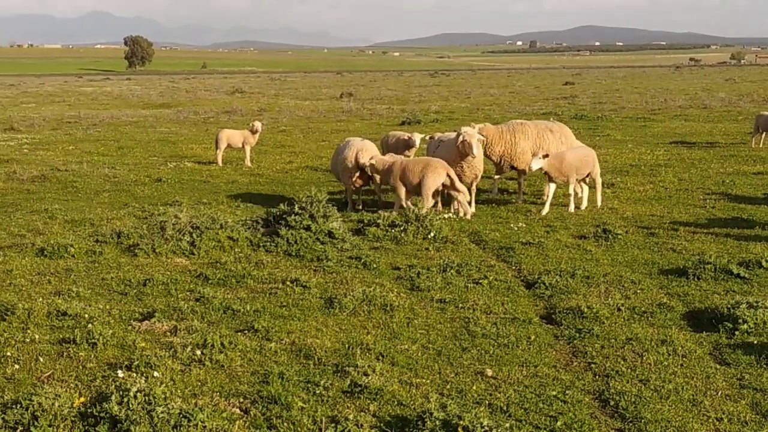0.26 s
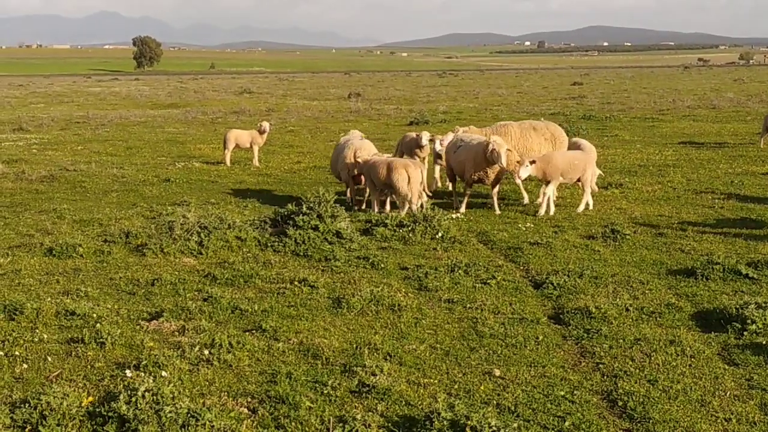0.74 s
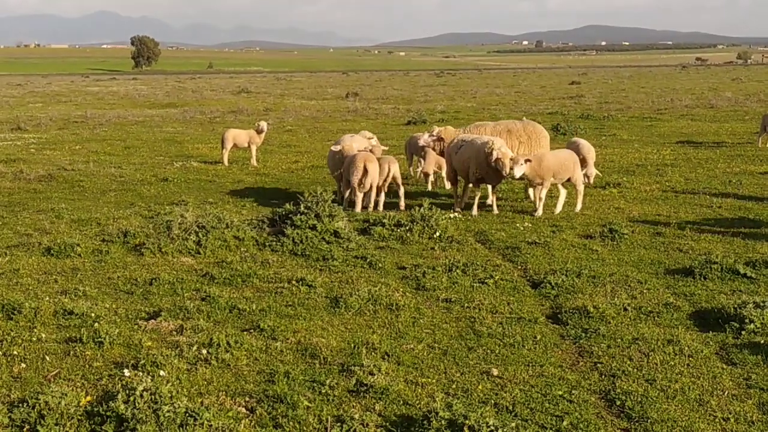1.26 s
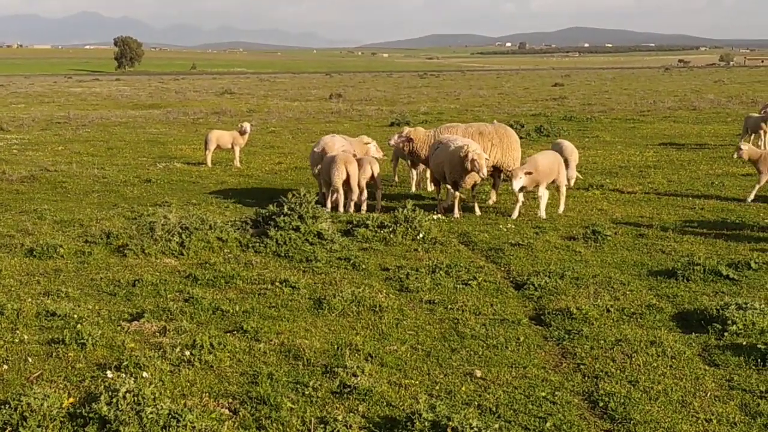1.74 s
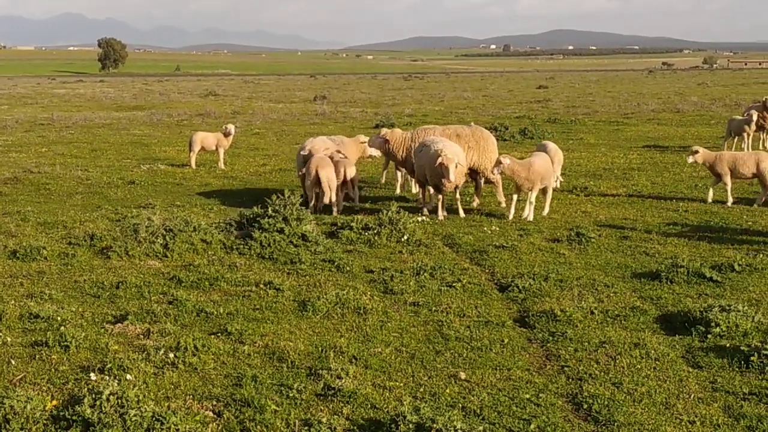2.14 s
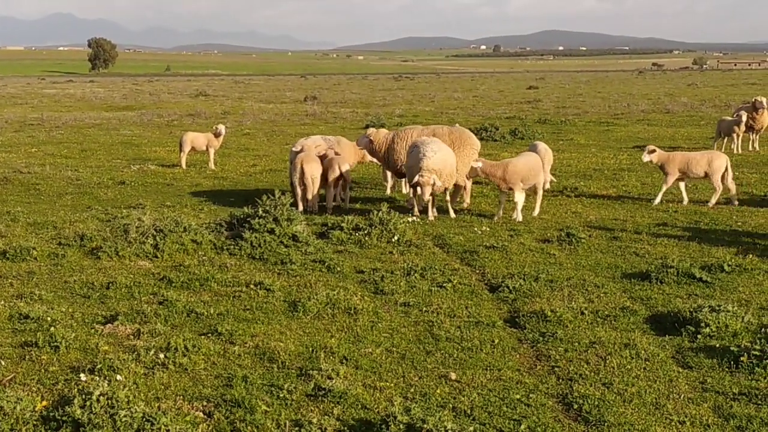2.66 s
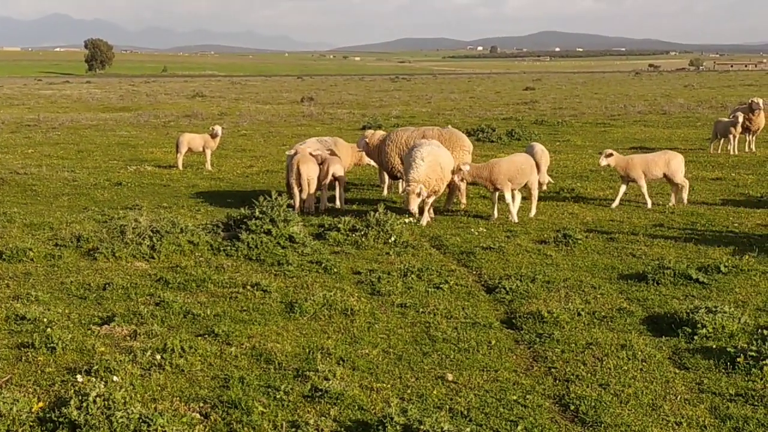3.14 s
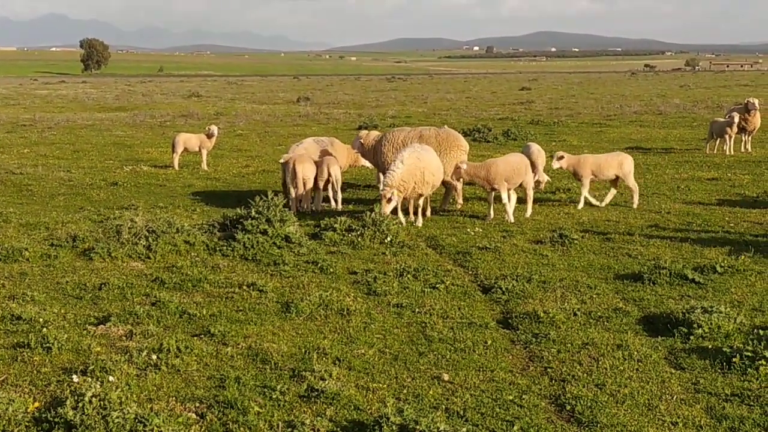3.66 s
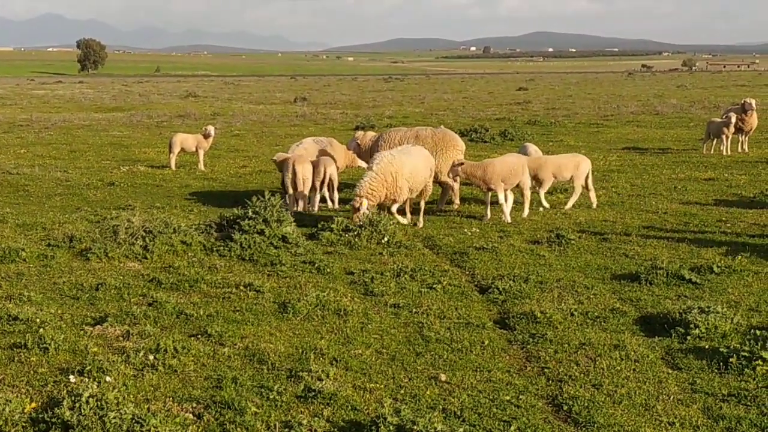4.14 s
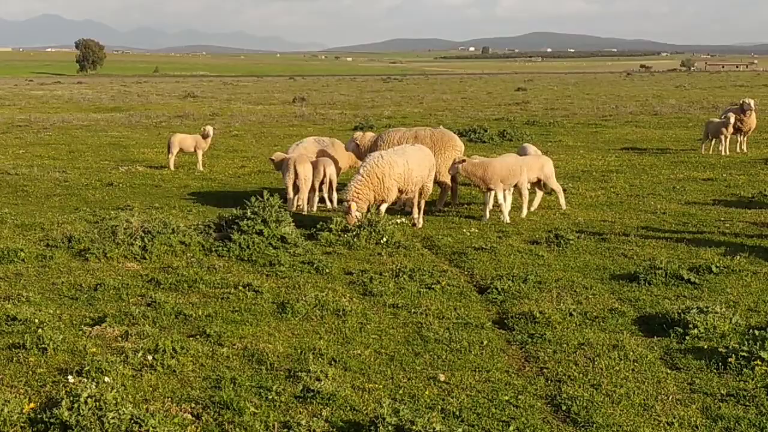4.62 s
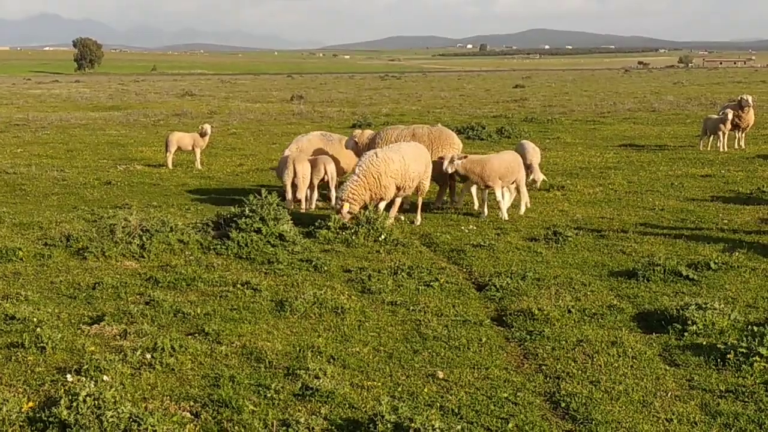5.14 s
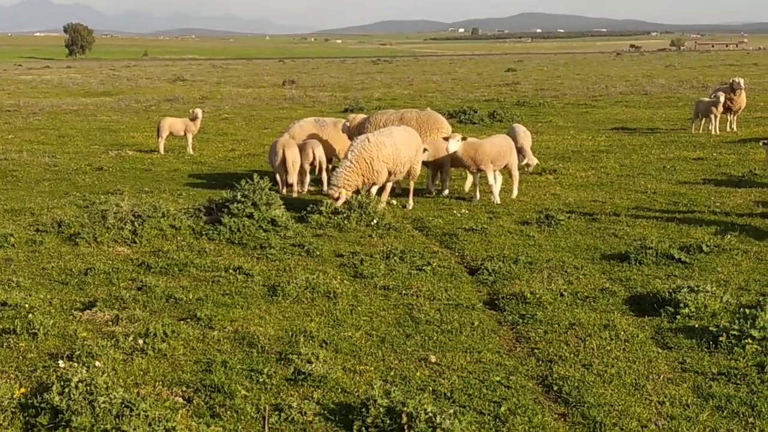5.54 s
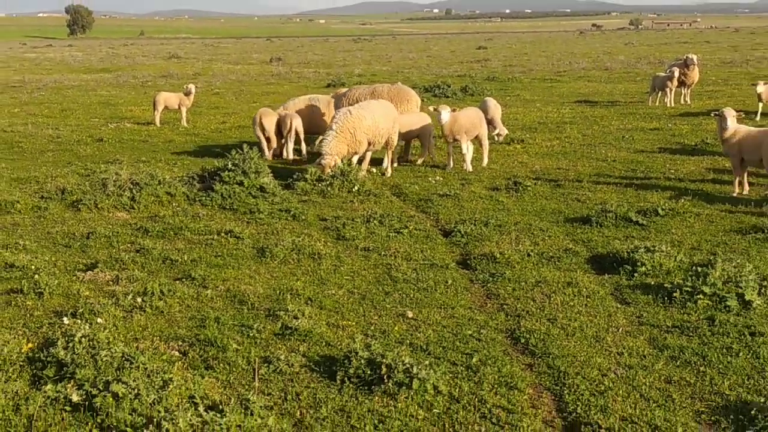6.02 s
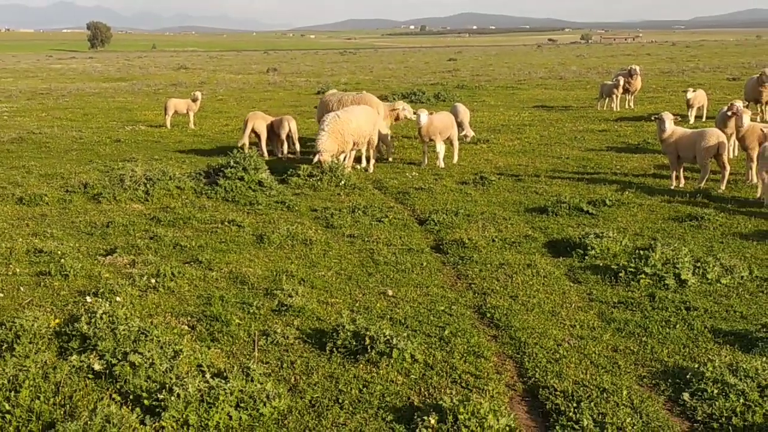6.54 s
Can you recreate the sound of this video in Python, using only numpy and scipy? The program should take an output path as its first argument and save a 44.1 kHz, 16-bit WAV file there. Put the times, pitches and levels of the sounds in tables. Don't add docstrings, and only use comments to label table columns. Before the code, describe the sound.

Rough, nasal bleats of ewes and brighter lambs overlap from the start, pause mid-way under gusting wind, then return in a close series. Wind thuds separately on each side of a handheld phone-like microphone, tearing and overloading near five seconds. Dry case ticks and two tiny bird chirps appear; a blurred far flock lies beneath, with little echo in the open pasture.

```python
import sys
import numpy as np
from scipy import signal
from scipy.fft import rfft, irfft, next_fast_len
from scipy.io import wavfile
from scipy.ndimage import uniform_filter1d

SR = 44100
rng = np.random.default_rng(int(sys.argv[2]) if len(sys.argv) > 2 else 0)


def rack_gain(trim_db):
    fader = np.asarray(trim_db, float)
    return 10 ** (fader / 20)


def waveform_to_disk(signal):
    frames = np.transpose(np.atleast_2d(signal))
    scaled = np.clip(frames, -1, 1) * 32767
    samples = np.round(scaled).astype(np.int16)
    wavfile.write(sys.argv[1], SR, samples)


N = 299438


def evened(x):
    return x / np.sqrt(np.mean(x ** 2) + 1e-20)


def curve(rows, t):
    s, *columns = np.transpose(rows)
    return [np.interp(t, s, c) for c in columns]


def wobble(size, top_hz):
    long = next_fast_len(size)
    hz = np.fft.rfftfreq(long, 1 / SR)
    slow = rfft(rng.standard_normal(long)) / (1 + (hz / top_hz) ** 4) * (hz > 0)
    return evened(irfft(slow, long)[:size])


def add(mix, s, sound):
    part = mix[:, round(s * SR):][:, :sound.shape[1]]
    part += sound[:, :part.shape[1]]


def glides(events, right_db):
    mix = np.zeros((2, N))
    for s, length, from_hz, to_hz, db in events:
        u = np.arange(0, 1, 1 / (length * SR))
        hz = to_hz + (from_hz - to_hz) * (1 - u) ** 1.42
        tone = np.sin(2 * np.pi * np.cumsum(hz) / SR) * np.sin(np.pi * u ** 0.76)
        add(mix, s, tone * rack_gain(np.array([[db], [db + right_db]])))
    return mix


# (frequency [Hz], density [dB per Hz])
FIELD_COLOUR = [(200, -4), (700, 0), (1100, -2.5), (1900, 1), (2800, -10.5), (4500, -14.5), (6500, -16.5),
                (8600, -14), (10300, -25.5), (13300, -36), (14300, -55)]
# (time [s], level [dB])
FIELD_SWELL = [(0, -42), (.6, -60.5), (1.2, -51.5), (2.6, -55), (3.4, -59.5), (3.55, -56.5), (3.9, -55.5),
               (5.3, -54.5), (5.6, -49.5), (6.8, -42.5)]
FIELD_PAN_DB = 3


def field(same=.4, patch_db=1.6):
    frames, hz = N // 256 + 5, np.fft.rfftfreq(1024, 1 / SR)
    a, b, c, d, patches = rng.standard_normal((5, 513, frames))
    patches = evened(uniform_filter1d(uniform_filter1d(patches, 8, 0), 20, 1))
    left = a + 1j * b
    right = same * left + np.sqrt(1 - same ** 2) * (c + 1j * d)
    f, db = np.transpose(FIELD_COLOUR)
    colour_db = np.interp(np.log(hz + 1), np.log(f), db, left=-60)[:, None]
    z = np.array([left, right]) * rack_gain(colour_db + patch_db * patches * (0.93 + hz[:, None] / 5000))
    x = evened(signal.istft(z, nperseg=1024, noverlap=768)[1][:, :N])
    x = x * rack_gain(curve(FIELD_SWELL, np.arange(N) / SR)[0])
    return np.array([np.roll(x[0], shift=17) * rack_gain(FIELD_PAN_DB / 2), x[1] / rack_gain(FIELD_PAN_DB / 2)])


# (time [s], length [s], from [Hz], to [Hz], level [dB])
CHIRPS = [
    (2.686, .025, 4070, 5020, -64),
    (2.978, 0.03, 3540, 4600, -68),
]


def bird():
    return glides(CHIRPS, 5.5)


GUST_SHAPE, CALM_DB = 1.178, -45


def gust(events, t):
    power = rack_gain(2 * CALM_DB)
    for s, db, rise_ms, fall_ms in events:
        away = 1000 * abs(t - s) / np.where(t < s, rise_ms, fall_ms)
        power = power + rack_gain(2 * (db - 20 * away ** GUST_SHAPE))
    return 10 * np.log10(power)


# (time of peak [s], peak level [dB], rise by 20 dB [ms], fall by 20 dB [ms])
GUSTS_LEFT = [(.192, -15, 72, 196), (.39, -13.5, 100, 205), (.62, -23, 178, 51), (.775, -21, 74, 49),
              (1.006, -20.5, 21, 264), (1.361, -13.5, 106, 247), (1.8, -25, 284, 103), (2.296, -28, 51, 93),
              (2.465, -17, 92, 89), (2.766, -22.5, 89, 91), (2.919, -20, 38, 226), (3.163, -21, 331, 20),
              (3.426, -15, 239, 200), (3.892, -19.5, 175, 33), (3.97, -14, 75, 88.5),
              (4.11, -15.5, 148, 35), (4.212, -10.5, 38, 52), (4.279, -15, 37, 207), (4.75, -24.5, 66, 297),
              (4.949, -13.5, 256, 62), (4.989, -13.5, 43, 348.5), (5.09, -9.5, 15, 253),
              (5.195, -12, 49, 258), (5.385, -12, 120.5, 330), (5.531, -12.5, 159, 278),
              (5.725, -14, 46, 230), (5.856, -11.5, 48.5, 155), (6.029, -16, 61, 65),
              (6.14, -18.5, 58.5, 102), (6.429, -13.5, 204, 193)]
GUSTS_RIGHT = [(0.236, -22, 172, 94), (0.353, -21, 40, 46.1), (1.138, -37, 569, 211),
               (1.329, -28, 45, 105.7), (1.422, -27.5, 56, 260), (1.693, -25.5, 180, 90),
               (1.824, -23.5, 91.7, 63.3), (2.142, -28.5, 268, 147.7), (2.391, -26.5, 35.93, 241),
               (2.772, -25.5, 205.7, 81), (2.858, -22.5, 43, 463), (3.071, -14.5, 46.7, 80),
               (3.512, -25, 135, 206), (4.025, -16.5, 293, 147), (4.274, -17, 66.4, 133.8),
               (4.499, -23, 292, 210), (4.763, -21.5, 37, 127), (4.89, -11.5, 29.4, 125),
               (5.132, -19.5, 362, 52), (5.236, -19.5, 116, 147), (5.349, -22, 67.6, 77),
               (5.487, -19, 86.5, 191), (5.693, -21.5, 173, 95), (5.989, -15, 261, 214),
               (6.524, -32, 222, 32), (6.77, -23.5, 156, 99.6)]
# (time [s], extra treble
# level [dB])
SQUALLS = [
    (.42, -4),
    (1.45, -5),
    (3.4, -6),
    (3.99, 1),
    (4.92, 3),
    (5.2, 10),
    (5.28, 3),
    (5.38, 5),
    (5.47, 6),
    (5.72, 4),
]
# (frequency [Hz], level [dB], gain per dB of gust [dB])
BUFFET = [(22.1, -31, 0.56), (42, -23, 0.85), (118, -24, 0.87), (170.6, -17.5, 1.11), (307.4, -23, 1.44),
          (506, -34, 1.5), (1014, -45.5, 2), (1546, -54.5, 1.81), (3460, -79.5, 1.12)]


def wind(gusts, bass_db, squalls, lump_db=2.0, jab_db=2.2):
    size, t = next_fast_len(N), np.arange(N) / SR
    slow_t = t[::64]
    octave = np.log2(np.fft.rfftfreq(size, 1 / SR) + 1)
    noise = rfft(rng.standard_normal(size))
    gust_db = uniform_filter1d(np.repeat(gust(gusts, slow_t), repeats=64), size=64)[:N]
    lumps, jabs = 2 * np.tanh(np.array([wobble(N, 29), wobble(N, 98)]) / 2)
    slow_squall_db = 0 * slow_t
    for s, db in squalls:
        slow_squall_db = slow_squall_db + db * np.exp(-((slow_t - s) / 0.068) ** 2)
    squall_db = np.interp(t, slow_t, slow_squall_db)
    centres, out = np.log2([row[0] for row in BUFFET]), np.zeros(N)
    corners = np.r_[centres[0] - 1, centres, centres[-1] + 1]
    for k, (hz, db, steep) in enumerate(BUFFET):
        share = np.interp(octave, corners, np.arange(len(corners)) == k + 1)
        high = np.clip(hz / 900, 0, 1)
        swing_db = gust_db + 13 + lump_db * lumps + high * (jab_db * jabs + squall_db)
        band = evened(irfft(noise * share, size)[:N])
        out += band * rack_gain(db + steep * swing_db + bass_db * (hz < 100))
    return out


# (time [s], peak level [dB], left minus right [dB], treble fall [dB per octave])
SLAPS = [(0.174, -22.5, 18.5, 8), (0.452, -24, 28, 24.5), (0.511, -34, 26, 30), (0.748, -32.5, 25, 30),
         (1.341, -20, 26, 21), (2.461, -57, 13.5, 6), (2.734, -33, 7, 19.5), (2.774, -48, 15, 10),
         (2.865, -42, -7, 26), (3.054, -36, -13, 12), (3.339, -32, 26, 16), (3.92, -34, -7, 19),
         (3.951, -24, 16, 26), (3.972, -27.5, -7.5, 18), (3.995, -22.5, 0, 14.5), (4.029, -35.5, 1.5, 12),
         (4.208, -24.5, 20, 21), (4.751, -30, 1, 12), (4.87, -28.5, 0, 19), (4.89, -13, -8, 22.5),
         (4.92, -24, 22, 10), (4.991, -17, 19, 24), (5.014, -27, -13, 20.5), (5.035, -20, 10, 20),
         (5.056, -20.5, 2, 18), (5.087, -17, 18.5, 15.5), (5.124, -14, 18.5, 11), (5.164, -13.5, 20, 12.5),
         (5.193, -21, 20, 15.5), (5.205, -22.5, 19.5, 9), (5.211, -12.5, 20, 11.5), (5.216, -17.5, 18, 12),
         (5.267, -13, 18.0, 17.5), (5.362, -13.5, 30, 18), (5.377, -20, 22, 13.5), (5.414, -14.5, 39, 15),
         (5.456, -22, 20, 14), (5.464, -19, 20, 14.5), (5.484, -21, 20, 13), (5.526, -18.5, 5, 19.5),
         (5.569, -27, 27, 26), (5.59, -18.5, 19, 25), (5.618, -16.5, 8, 25), (5.71, -23.5, 15, 11),
         (5.761, -27, 9, 18), (5.806, -26, 8, 23), (5.847, -28.5, 9, 13.5), (5.914, -24.5, 1, 14),
         (6.018, -20.5, 10, 17)]
SLAP_RISE_S, SLAP_FALL_S, SLAP_HZ, SLAP_TOP_HZ = 0.0024, 0.0067, 419, 5000
SNAP_DB = -4.5


def slaps():
    mix, t = np.zeros((2, N)), np.arange(2048) / SR
    octave = np.log2(np.fft.rfftfreq(2048, 1 / SR) / SLAP_HZ + 1e-3)
    top_loss = 1 + (2 ** octave * SLAP_HZ / SLAP_TOP_HZ) ** 4
    shape = (1 - np.exp(-t / SLAP_RISE_S)) * np.exp(-t / SLAP_FALL_S)
    for s, db, pan_db, fall_db in SLAPS:
        colour = rack_gain(np.where(octave > 0, -fall_db * octave, 9 * octave)) / top_loss
        burst = irfft(rfft(rng.standard_normal((2, 2048))) * colour) * shape
        burst = burst / abs(burst).max(axis=1, keepdims=True)
        snap = np.roll(irfft(colour * rack_gain(2.1 * np.maximum(octave, 0))), shift=130)
        burst = burst + rack_gain(SNAP_DB) * np.sign(burst[:, 130:131]) * snap / snap.max()
        add(mix, s - .001, burst * rack_gain(db + 7 + np.minimum([[pan_db], [-pan_db]], 0)))
    return mix


# (time [s], length [s], from [Hz], to [Hz], level [dB])
THUMPS = [
    (5.314, 0.008, 1300, 200, -12),
    (6.7228, 0.0083, 1940, 445.6, -22),
]


def thumps():
    return glides(THUMPS, -26.5)


# (time [s], crack level [dB], knock level [dB], right port below left [dB])
TICKS = [
    (1.1162, -25, -27.5, 27),
    (1.1824, -36, -28, 39),
    (1.363, -48, -21, 31),
    (1.666, -31, -22.5, 30),
    (3.688, -13, -13.5, 24),
    (5.6425, -12, -7.5, 24),
    (5.6543, -33, -24, 22),
    (6.2617, -14.5, -11, 35),
    (6.7125, -27, -21, 16),
]
# (frequency [Hz], width [Hz], level [dB], lateness [0 crack, about 1 knock])
CASE = [(9240, 840, 1.5, 0.0023), (13000, 1500, 2, 0.063), (6270, 830, -7.5, 0.054), (1900, 800, 3.5, 0.6),
        (610, 350, 0.5, 1.17)]


def ticks():
    mix, t = np.zeros((2, N)), np.arange(600) / SR
    for s, crack_db, knock_db, drop_db in TICKS:
        tick = np.zeros((2, len(t)))
        for hz, width, db, low in CASE:
            late = np.maximum(t - 0.001156 * low, 0)
            ring = np.sin(2 * np.pi * hz * rng.uniform(0.915, 1.113) * late) * np.exp(-np.pi * width * late)
            hit_db = knock_db if hz < 4000 else crack_db
            dull_db = .25 * (crack_db + 12) * (hz > 10000)
            far_db = np.array([[0], [-drop_db - 9 * (hz < 4000)]])
            tick += rack_gain(db + hit_db + dull_db + far_db) * ring
        add(mix, s - .0003, tick)
    return signal.sosfilt(signal.butter(12, 15700, fs=SR, output="sos"), mix)


def effort(t, db, attack, swell_db, release, mouth_db):
    along = np.clip((t - t[0]) / (t[-1] - t[0]), 0, 1)
    fade_db = 27.5 * np.clip(1 - (t[-1] - t) / release, 0, 1) ** 3.56
    arch_db = 2 * (np.sin(np.pi * along) - 1)
    return db + swell_db * (along - .5) + arch_db - fade_db, mouth_db


def resonate(x, hz, width):
    r, turn = np.exp(-np.pi * width / SR), np.exp(2j * np.pi * np.cumsum(hz) / SR)
    two_poles = [[(1 - r) ** 2, 0, 0, 1, -2 * r, r * r]]
    return 2 * (turn * signal.sosfilt(two_poles, x * turn.conj())).real


QUAVER_FROM_S, QUAVER_TO_S, QUAVER_HZ = 1.561, 2.41, 9.43
FLUTTER_DB, RASP_S = 1.2, .0005


def bleat(rows, breath_rule, throat, voice, moves, quaver, air=.17, strain=.03):
    rough, unsteady, lag, lag_growth = voice
    t = np.arange(rows[0][0], rows[-1][0] + .03, 1 / SR)
    along = (t - t[0]) / (t[-1] - t[0])
    (hz,), (effort_db, mouth_db) = curve(rows, t), effort(t, *breath_rule)
    shake = -np.cos(2 * np.pi * QUAVER_HZ * (t - QUAVER_FROM_S) + 0.5 * wobble(len(t), 4.4))
    shake = shake * (t > QUAVER_FROM_S) * (t < QUAVER_TO_S)
    effort_db = effort_db + 70 * quaver * shake
    mouth_db = mouth_db + 40 * quaver * shake
    turns = np.cumsum(hz * (1 + quaver * shake + unsteady * wobble(len(t), 60))) / SR + 1 - 1e-3
    folds = np.diff(np.floor(turns), prepend=0) * rack_gain(3 * rough * wobble(len(t), 90))
    flap = np.arange(200) / SR / RASP_S
    spread = rfft(rng.standard_normal(200) * flap * np.exp(-flap))
    rasp = signal.oaconvolve(folds, irfft(spread / abs(spread)) * np.exp(-flap / 4))[:len(t)]
    hiss = rng.standard_normal((3, len(t)))
    puffs = evened((.25 + np.exp(-(turns % 1) / .4)) * (hiss[0] + .8 * hiss[1:]))
    weak = strain * (effort_db.max() - effort_db)
    opening = np.sqrt(np.clip((t - t[0]) / breath_rule[1], 0, 1))
    push = rack_gain(effort_db) * np.clip((rows[-1][0] - t) / 0.017, 0, 1) * opening
    out, plain = np.zeros((2, len(t) + 128)), 0
    slow_t = t[::64]
    for k, ((f, width, left_db, right_db), swell_db, bulge_db, slide) in enumerate(zip(throat, *moves)):
        noisy = np.clip((rough + weak) * min(f / 1500, 1) + air * f / 8000, 0, 1)
        drive = np.sqrt(1 - noisy ** 2) * evened(rasp if f > 4000 else folds) + noisy * puffs
        flutter = np.interp(t, slow_t, wobble(len(slow_t), 18 * 64))
        move_db = swell_db * (along - .5) + bulge_db * (2 * np.sin(np.pi * along) - 1.3)
        move_db = move_db + FLUTTER_DB * min(f / 3000, 1.5) * flutter
        shape = push * rack_gain(mouth_db * max(np.log2(f / 1500), 0) + move_db)
        ring = (-1) ** k * resonate(drive * shape, f * (1 + slide * (along - .5) / 100), width)
        start = 64 + round(np.clip(lag + lag_growth * (min(f, 3000) - 1500) / 1000, -60, 60))
        out[0, start:start + len(t)] += rack_gain(left_db) * ring[0]
        out[1, 64:64 + len(t)] += rack_gain(right_db) * ring[1]
        plain += width * (rack_gain(left_db) ** 2 + rack_gain(right_db) ** 2)
    return out / np.sqrt(plain / SR)


# (time [s], pitch [Hz])
EWE_NEAR = [(0, 134.9), (.066, 138.9), (.13, 133.7), (.165, 124.4), (.215, 135.5), (.315, 132.2),
            (.35, 125.8), (.42, 119.7), (.465, 112)]
EWE_FAR = [(.73, 112.9), (0.85, 126.6), (.899, 134.7), (1.05, 131.4), (1.2, 127.6), (1.45, 118.8)]
LAMB_FAR = [(1.07, 161.3), (1.13, 162.3), (1.38, 166), (1.479, 165)]
EWE_LONG = [(1.399, 120.4), (1.55, 133.6), (1.65, 137), (1.849, 141.1), (2.049, 141.3), (2.302, 133.1),
            (2.44, 128.4), (2.639, 116.2)]
LAMB_RISING = [(3.85, 172), (4.039, 176.2), (4.199, 188), (4.38, 194.1), (4.501, 191)]
EWE_HOARSE = [(4.37, 129), (4.499, 141.5), (4.719, 142.2), (4.91, 137.2)]
EWE_BEHIND = [(4.72, 119.1), (5.098, 122.7), (5.261, 102)]
LAMB_CLEAR = [(5.682, 130.5), (5.74, 134.8), (5.8, 148.8), (5.859, 156.3), (5.916, 157.8), (6.139, 159),
              (6.351, 155.7)]
EWE_RIGHT = [(6.13, 130.7), (6.25, 136.9), (6.311, 144.8), (6.447, 142.8), (6.551, 139.5), (6.629, 137),
             (6.691, 128.3), (6.735, 122)]
EWE_LAST = [(6.733, 155), (6.9, 161.5)]
LAMB_SHRILL = [(.72, 301), (.76, 340.5), (.8, 392), (.87, 400), (1.15, 393), (1.34, 387)]
CALLS = [EWE_NEAR, EWE_FAR, LAMB_FAR, EWE_LONG, LAMB_RISING, EWE_HOARSE, EWE_BEHIND, LAMB_CLEAR,
         EWE_RIGHT, EWE_LAST, LAMB_SHRILL]
# (frequency [Hz], width [Hz], left [dB], right [dB])
THROATS_EARLY = [
    [(265, 110, -13.5, -10.5), (666, 76, -4.5, -4), (1517, 166, 1, 7), (2163, 240, -1, -5),
     (2646, 370, -5.5, -36), (4500, 3700, -21, -22.5), (6300, 1600, -15.5, -22.5), (8000, 2700, -23, -28.5)],
    [(393, 330, -14, -8.5), (652, 47, -7.5, -11), (1420, 160, -17, -13), (1850, 300, -13, -17),
     (2330, 160, -21, -35)],
    [(629, 38, -1, -22), (1460, 180, -9, -14), (2050, 214, -13, -22.5), (2730, 250, -28.5, -45)],
    [(670, 260, -21, -18), (1440, 174, 0, -7), (2236, 570, -4.5, -10), (2740, 244, -0.5, -9),
     (3730, 1250, -24.5, -29.5), (4970, 1040, -19, -26)],
]
THROATS_MIDDLE = [
    [(755, 320, -41, -26), (1625, 330, -10, -15.5), (2215, 310, -10, -17.5), (2960, 1500, -25.5, -29),
     (6060, 4600, -45, -41)],
    [(700, 530, -7.5, -7.5), (1380, 142, 2.5, 7), (2150, 540, 2.5, -9), (2880, 660, 1, -3.5),
     (4140, 460, -13, -9.5), (5860, 210, -8.5, -11), (6470, 370, -9.5, -27), (7400, 3300, -15.5, -18)],
    [(1404, 150, -11.5, -13), (1960, 630, -16.5, -22), (4260, 740, -32.5, -26), (7580, 2500, -26.5, -28.5)],
]
THROATS_LATE = [
    [(660, 120, -11, -25), (1522, 145, -47, -15), (2136, 320, -10, -8.5), (3420, 1100, -27.5, -57),
     (4090, 500, -28, -27), (6420, 1700, -22, -30)],
    [(626, 380, -24, -3), (1455, 180, 4, 12), (1987, 105, 10, 8), (2260, 235, 0, 6.5),
     (3120, 1300, -14.5, -57), (4600, 1030, -15.5, -10), (6740, 2400, -14, -44), (9300, 1000, -26, -45)],
    [(696, 230, -12, -24), (1450, 220, -17, -36), (2000, 370, -24, 3), (6770, 1795, 1.5, -16)],
    [(780, 430, -19, -8), (2810, 290, -5, -15)],
]
# (roughness [0-1], unsteadiness of pitch [ratio], left lag at 1.5 kHz [samples], growth [samples per kHz])
VOICES = [(.2, .006, -3.5, 11.5), (.15, .0018, -6, 3.5), (.25, .003, 16, 1), (.15, .006, 17, 2),
          (.12, .0012, 18, 1), (.44, .014, -4, 8.5), (.5, .03, 20.5, 3.5), (.02, .0016, -16.5, 4),
          (.22, .002, -17.5, 2.5), (.2, .012, 25, 8), (.2, .0031, 17.5, 1)]
# (effort [dB], attack [s], swell [dB], release [s], mouth opening above 1.5 kHz [dB per octave])
EFFORTS = [(-34, 0.0003, 0, 0.14, 4.5), (-50, 0.08, -11, 0.19, -2), (-42, 0.072, 0, 0.32, 1.5),
           (-36.5, 0.044, 4, 0.88, 0.5), (-46.5, 0.3, 13, 0.055, -1), (-32, 0.12, 4.5, 0.52, 0),
           (-43, 0.014, -8, 0.17, -0.5), (-36, 0.38, -8, 0.16, -1), (-31, 0.16, 4, 0.28, 0.5),
           (-30.5, 0.096, 10, .01, -2), (-64, 0.019, -18, .05, -4.5)]
# (gain [dB], ..)
SWELLS = [
    [-13, -8, -7.5, -2, 3.5, 2.5, 6, -2],
    [15, -5, -1, -11, 1],
    [1, 2, 1, 1],
    [1, 1, -1, 1, -1, 1],
    [1, 1, 1, 1, 1],
    [4, 12, 2, -5, -8, -1, 1, -3],
    [1, 1, 1, 1],
    [-5, 3, -2.5, -1, -1, 11],
    [1, 1, 1, -1, 1, -1, -1, 1],
    [1, 1, 1, 1],
    [1, -15],
]
# (gain [dB], ..)
BULGES = [
    [0.77, -1.5, 0, 2.5, -1.5, -1.3, -0.5, 1],
    [1, 1, 1, 1, 1],
    [1, 1, 1, 1],
    [1, 0.95, 1.4, 1.3, 1.3, 6],
    [1, 1, 1, 1, 1],
    [1.3, 1.3, 0.5, 2.4, 5.6, 5.3, 10, 1.4],
    [1, 1, 1, 1],
    [1, 1, 0.65, 1, 1.5, 5.4],
    [0.92, 1.8, 1.1, 0.92, 1.1, 2, 3, 0.95],
    [1, 1, 1, 1],
    [1, 0.77],
]
SLIDES = [
    [5, -8, -3.5, 1, 6, 13, -6, 4],
    [1, -1.7, 2, 2, 1],
    [1, 2, 2, 1],
    [-6, -4, -4, 1, 0, -10],
    [1, 1, 1, 1, 1],
    [-1, 3, 8, -4, 2, 3, 16, -1],
    [1, 1, 1, 1],
    [1, 1, -2.1, 1, -1, -2],
    [-3, -7, 2, 3, -1, -7, -13, -7],
    [1, 1, 1, 1],
    [0.92, 1],
]
ECHO_DB, ECHO_T60_S = -13, 0.1
SPIT_DB, SPIT_SWING_DB = -13, 4.5


def flock():
    mix, throats = np.zeros((2, N)), THROATS_EARLY + THROATS_MIDDLE + THROATS_LATE
    for rows, breath_rule, throat, voice, *moves in zip(CALLS, EFFORTS, throats, VOICES,
                                                        SWELLS, BULGES, SLIDES):
        quaver = 0.015 * (rows is EWE_LONG)
        add(mix, rows[0][0], bleat(rows, breath_rule, throat, voice, moves, quaver))
    t = np.arange(6000) / SR
    sparse = rng.standard_normal((2, len(t))) * (rng.random((2, len(t))) < .05)
    scatter = sparse * rack_gain(-60 * t / ECHO_T60_S) * (t > .004)
    echo = signal.oaconvolve(mix, scatter / np.linalg.norm(scatter[0]), axes=1)[:, :N]
    mix = mix + rack_gain(ECHO_DB) * echo
    spit = signal.sosfilt(signal.butter(8, [12200, 15000], "band", fs=SR, output="sos"), mix)
    spit = spit * rack_gain(SPIT_DB + SPIT_SWING_DB * wobble(N, 25))
    return spit + signal.sosfilt(signal.butter(10, 10300, fs=SR, output="sos"), mix)


# (frequency [Hz], width [Hz], depth [0-1])
PORTS = [
    [(3747, 180, 0.6), (5080, 140, 0.4)],
    [(3410, 300, 0.7), (6070, 470, 0.8)],
]
CLEAR_FROM_S, CLEAR_TO_S = 0.55, 2.9


def ports(x):
    out, t = [], np.arange(N) / SR
    clear_s = [CLEAR_FROM_S - .1, CLEAR_FROM_S, CLEAR_TO_S, CLEAR_TO_S + .1]
    shaded = 1 - np.interp(t, clear_s, [0, 1, 1, 0])
    for side, notches in zip(x, PORTS):
        for hz, width, depth in notches:
            peak = signal.lfilter(*signal.iirpeak(hz, hz / width, SR), side)
            side = side - depth * (shaded if hz > 4000 else 1) * peak
        out.append(side)
    return np.array(out)


def scene():
    outside = ports(field() + bird() + flock())
    gusts = np.array([wind(GUSTS_LEFT, 0.1, SQUALLS), wind(GUSTS_RIGHT, -0.5, [])])
    return outside + gusts + slaps() + thumps() + ticks()


HOLE_DB, HOLE_FROM_HZ = -4.4, 3000


def pruned(x):
    hz, t, z = signal.stft(x, SR, nperseg=1024)
    power = (abs(z) ** 2).sum(0)
    near = uniform_filter1d(uniform_filter1d(power, size=5, axis=0), size=4, axis=1)
    around = np.exp(uniform_filter1d(np.log(near + 1e-20), size=25, axis=0))
    keep = (near > rack_gain(2 * HOLE_DB) * around) | (hz[:, None] < HOLE_FROM_HZ)
    top = near[hz > 12000].sum(0)
    keep = keep | (top > 300 * np.median(top))
    return signal.istft(z * np.where(keep, 1, .03), SR, nperseg=1024)[1][:, :N]


def roll_off(x):
    return signal.sosfilt(signal.butter(12, 16680, fs=SR, output="sos"), x)


def record(dry):
    bent = dry / (1 + (abs(dry) / 1.06) ** 4) ** .25
    return roll_off(pruned(bent))


dry = scene()
out = record(dry)
waveform_to_disk(out)
```